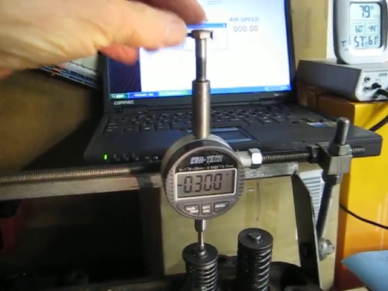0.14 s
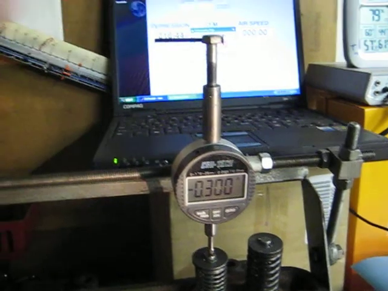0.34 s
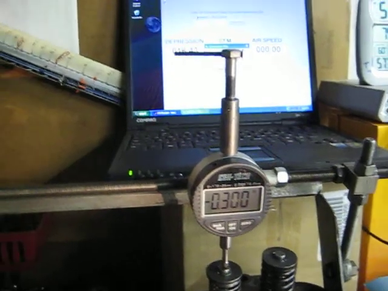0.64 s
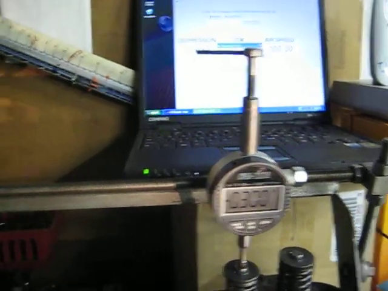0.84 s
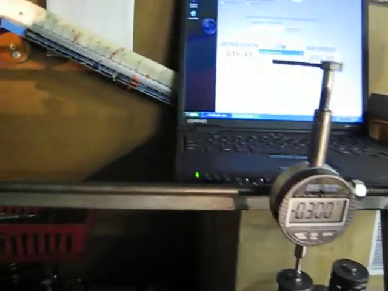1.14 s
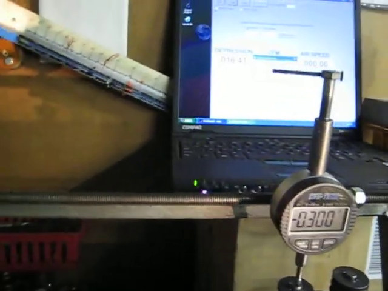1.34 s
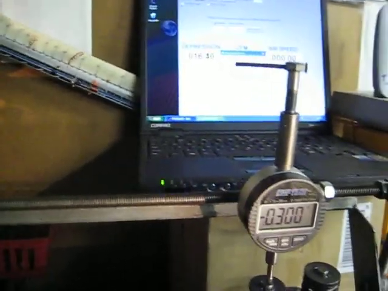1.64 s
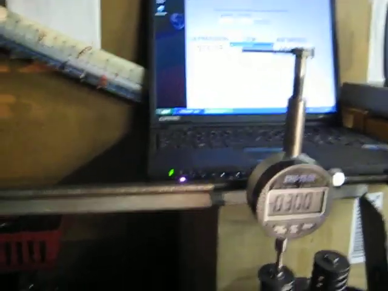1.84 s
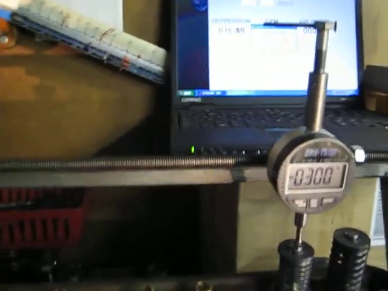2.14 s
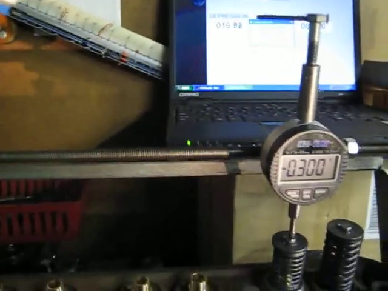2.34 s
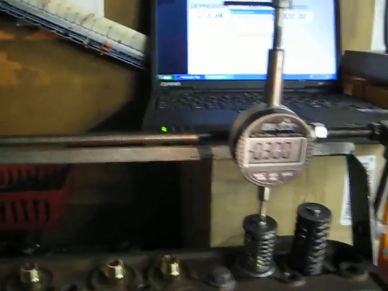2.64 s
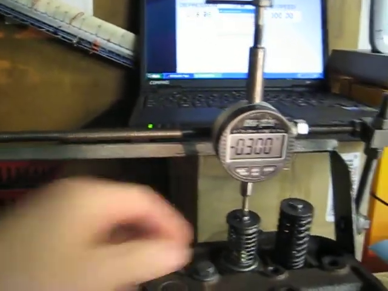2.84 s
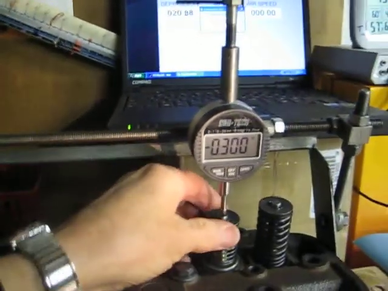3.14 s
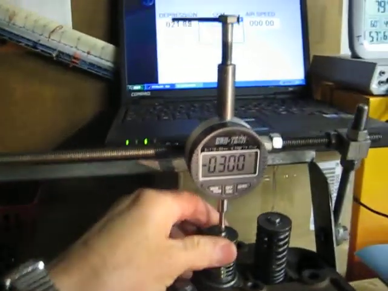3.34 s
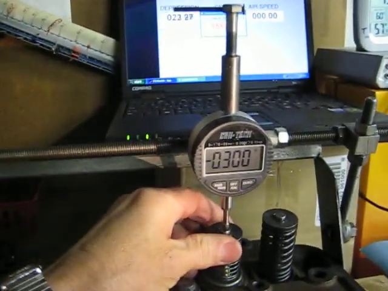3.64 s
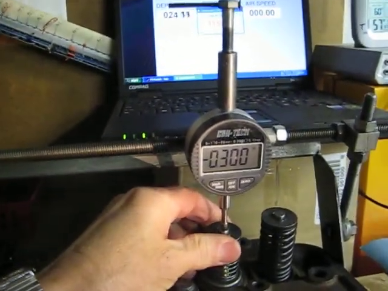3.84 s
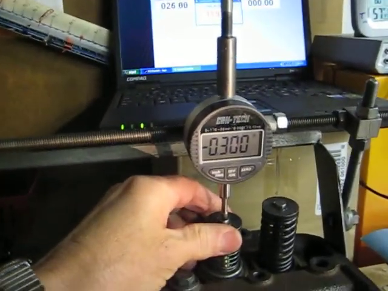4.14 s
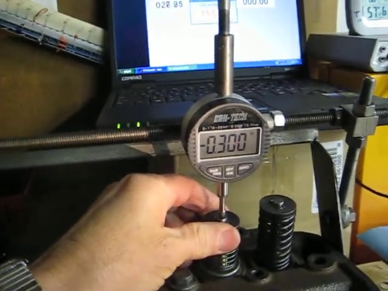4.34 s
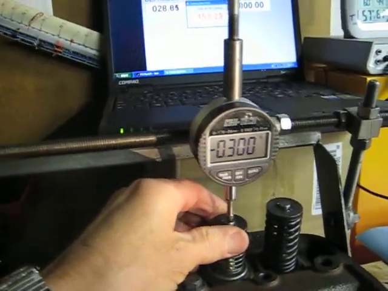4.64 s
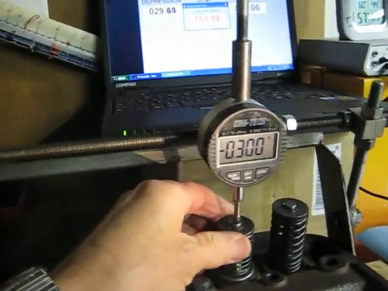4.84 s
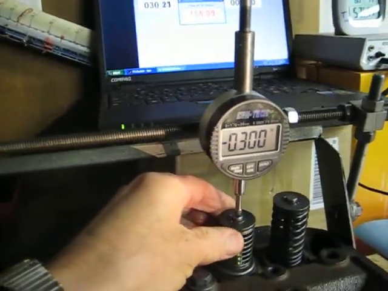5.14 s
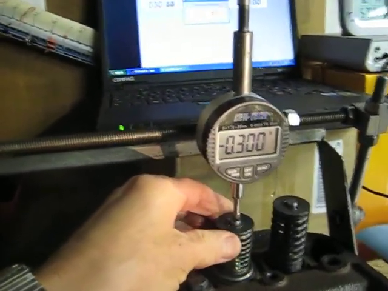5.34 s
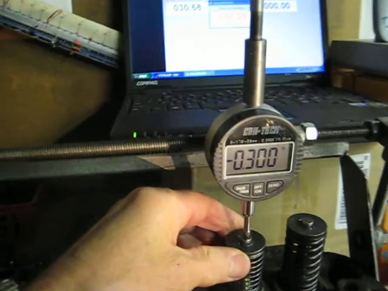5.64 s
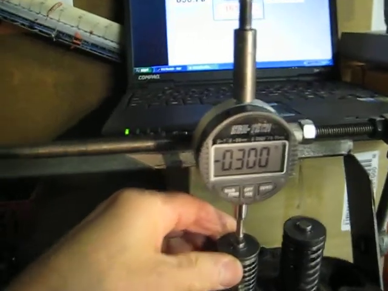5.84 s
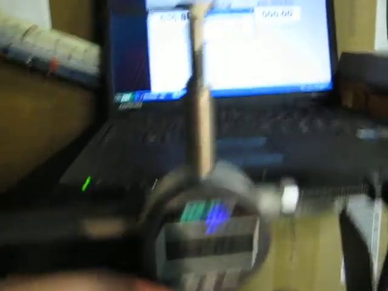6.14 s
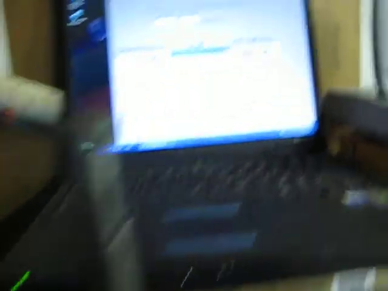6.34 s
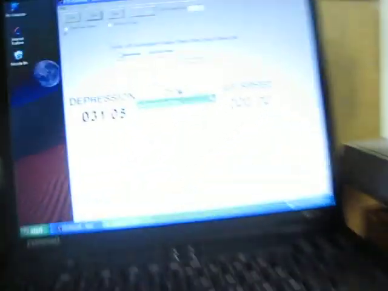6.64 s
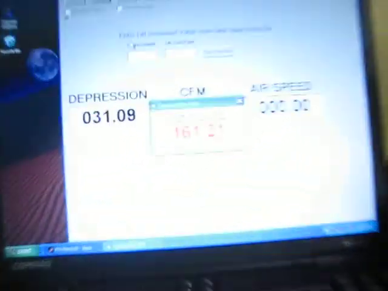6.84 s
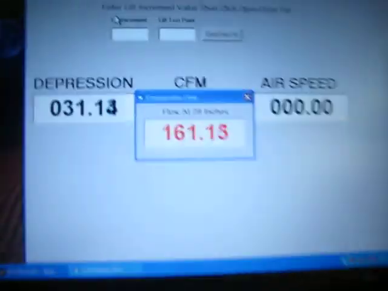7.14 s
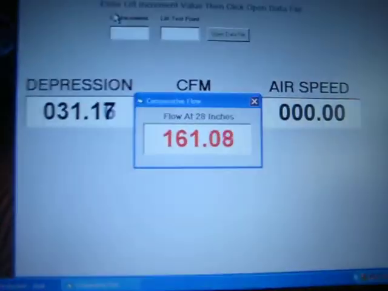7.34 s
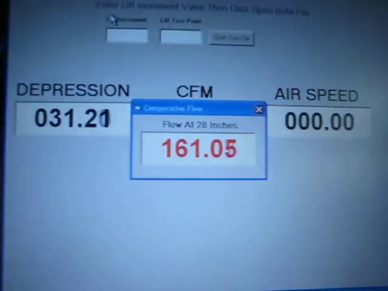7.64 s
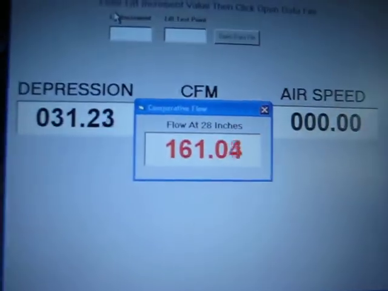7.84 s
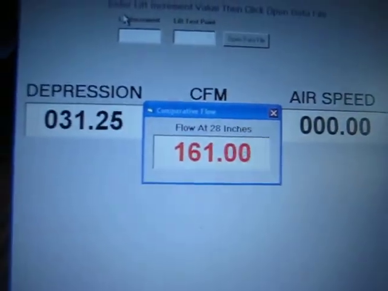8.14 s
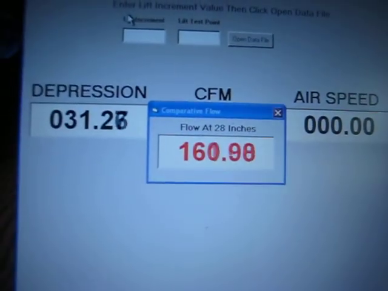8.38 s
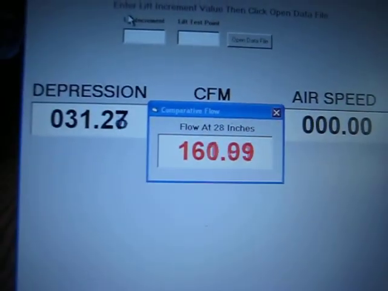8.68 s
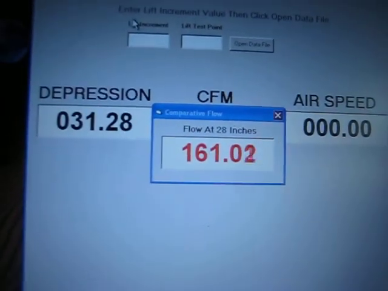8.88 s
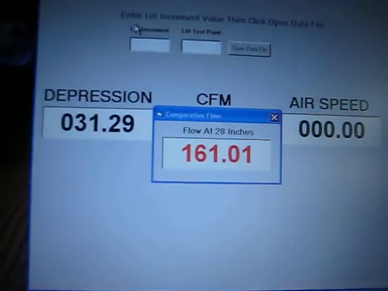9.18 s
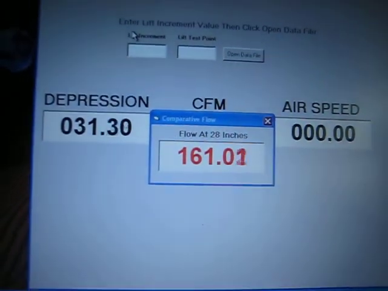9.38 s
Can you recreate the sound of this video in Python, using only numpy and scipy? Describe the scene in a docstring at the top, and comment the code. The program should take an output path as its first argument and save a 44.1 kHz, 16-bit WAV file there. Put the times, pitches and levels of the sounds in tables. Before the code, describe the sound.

From 0 seconds, a workshop air-suction machine is already running. Close to the valve, dense hiss rushes over two motor hums near 400 to 435 hertz that beat in a fast flutter, with a lower rotor, faint mains hum and a thin wavering whine near 3.5 kilohertz. At about 1.7 seconds another motor starts from rest, sweeping quickly upward; one running motor sags briefly, and the whine flares near 1.9. From 2 to 5 seconds suction builds: rotors creep up in pitch, the whine sinks back and the hiss brightens, fluttering slightly. Around 6 to 7.4 seconds the handheld microphone swings toward the cabinet; hiss bands sweep and glide with a hollow, phasing colour and the drone surges, its lows swelling. From 7.5 to 9.5 seconds it stays steady: loud resonant drone near 448 hertz, singing panels and coarse airy roar, without a stop.

```python
"""In a workshop, a flow bench sucks air through a cylinder head. Two vacuum motors, drawn as wavering sines,
beat against each other over a slower rotor. Near two seconds a late motor starts, the suction builds, the
rotors climb in speed and the hiss at the valve, which is filtered noise, brightens. At six seconds the
microphone swings from the port to a laptop on the bench, where the cabinet drones and sings louder."""
import sys
import numpy as np
from scipy import signal
from scipy.io import wavfile
from scipy.ndimage import uniform_filter1d

SR = 44100
rng = np.random.default_rng(int(sys.argv[2]) if len(sys.argv) > 2 else 0)


def pcm_store(signal):
    """Save signal as 16-bit PCM."""
    levels = np.round(np.clip(np.atleast_2d(signal), -1, 1) * 32767)
    wavfile.write(sys.argv[1], SR, levels.astype(np.int16).T)


N = 419391

# place of the hand-held microphone: (time [s], nearness [0 at the valve to 1 at the cabinet])
NEAR = [(0, 0.084), (1.3, 0.31), (1.85, 0.3), (2.5, 0.084), (4.1, 0.037), (6.0, 0.08), (6.5, 0.8),
        (7.35, 0.88), (9.5, 0.88)]
# rotors in the order fast, middle, late, slow:
# (shaft at low suction [Hz], shaft at full suction [Hz], lag [s], settling [s], deepest sag [Hz])
ROTOR_SPEEDS = [(434.4, 447.7, .08, 1.15, 0), (405.3, 416, 0, .9, 9.7), (380, 398.7, 0, 1.25, 0),
                (160, 258.5, .6, 1.05, 0)]
# the same rotors, before their own fades:
# (level at the valve [dB], level at the cabinet [dB], extra at low suction [dB], change in the quiet spot [dB])
ROTOR_LEVELS = [(-50.5, -21.5, 5.8, -2.5), (-43.5, -31.5, 6.5, -3.5), (-48.5, -34.5, 4.5, -4),
                (-66, -51, 5, -10)]
SWITCH_S = 1.72  # the late motor is switched on
BASS_NEAR = (0.76, 0.91)  # the lows of the cabinet only swell over this stretch of nearness


def undb(db):
    """Decibels to gain."""
    return 10 ** (np.asarray(db) / 20)


def curves(table, t):
    """The columns of a table, read at times t."""
    s, *columns = np.transpose(table)
    return [np.interp(t, s, column) for column in columns]


def nearness(t):
    """Where the microphone is, from 0 at the valve to 1 at the cabinet."""
    return curves(NEAR, t)[0]


def ramp(x, span):
    """Rises from 0 to 1 over a span of time or nearness."""
    return np.interp(x, span, [0, 1])


def walk(rate):
    """Random levels, rate of them a second, smoothed twice; spread near 1."""
    k = int(SR / rate)
    held = np.repeat(rng.standard_normal(N // k + 2), k)
    smooth = uniform_filter1d(uniform_filter1d(held, k), k)
    return 1.233 * smooth[:N]


def bells(f, modes):
    """Gain in dB of a set of bell-shaped peaks and dips."""
    return sum(db * np.exp(-(2 * (f - middle) / width) ** 2) for middle, width, db in modes)


def slope(f, points):
    """A spectrum in dB, straight between points on a log-frequency axis."""
    hz, db = np.transpose(points)
    return np.interp(np.log(f), np.log(hz), db)


def tone(hz, db, wobble_hz, flutter_db):
    """A sine of given rms level that wanders a little in pitch and strength."""
    phase = 2 * np.pi * np.cumsum(hz + wobble_hz * walk(25)) / SR
    return np.sqrt(2) * undb(db + flutter_db * walk(15)) * np.sin(phase)


def heard_db(levels, near, idle):
    """A source's level from where the microphone is and how low the suction (idle = 1) still is."""
    valve_db, cabinet_db, idle_db = levels
    return (1 - near) * valve_db + near * cabinet_db + idle * idle_db


def shaft_speed(t, low_hz, full_hz, lag_s, settle_s, sag_hz):
    """A rotor may sag while the late motor draws its starting current, then speeds up as the air thins."""
    sag_s = .33  # from the switch to the deepest sag
    suction = 1 - np.exp(-np.maximum(t - SWITCH_S - lag_s, 0) / settle_s)
    surge = np.maximum(t - SWITCH_S, 0) / sag_s
    sag = (surge * np.exp(1 - surge)) ** 1.3
    return low_hz + (full_hz - low_hz) * suction - sag_hz * sag


def rotor_db(t, levels, near):
    """A rotor's level; the swinging microphone crosses a quiet spot of the room's standing waves."""
    quiet_spot_s, quiet_length_s = 6.5, 0.44  # middle, length
    *steady, quiet_db = levels
    idle = 1 - ramp(t, (1.93, 3.1))  # the drone eases as the suction builds
    return heard_db(steady, near, idle) + bells(t, [(quiet_spot_s, quiet_length_s, quiet_db)])


def shaft_tone(hz, db):
    """A rotor shakes the cabinet once a turn."""
    return tone(hz, db, wobble_hz=0.25, flutter_db=0.4)


def motors(t):
    """The rotors that run from the start: the fast and middle speeds beat, and the fast one's fan whines."""
    # fade of the slow rotor, which sinks at the switch and returns with speed: (time [s], level change [dB])
    slow_fade = [(1.65, -2), (1.9, -16), (2.7, -10), (3.3, 2.5), (4.9, 4), (5.8, 1), (7.2, 3)]
    near = nearness(t)
    fast_speed, middle_speed, _, slow_speed = ROTOR_SPEEDS
    fast_level, middle_level, _, slow_level = ROTOR_LEVELS
    # the fast motor eases off by 1.2 Hz around the first second
    fast_hz = shaft_speed(t, *fast_speed) + 1.2 * (1 - ramp(t, (.5, 1.05)))
    fast_db = rotor_db(t, fast_level, near)
    fast = shaft_tone(fast_hz, fast_db)
    # it also shakes faintly three times a turn
    third = undb(-23) * tone(3 * fast_hz, fast_db, wobble_hz=1.5, flutter_db=2.5)
    middle = shaft_tone(shaft_speed(t, *middle_speed), rotor_db(t, middle_level, near))
    slow_db = rotor_db(t, slow_level, ramp(near, BASS_NEAR)) + curves(slow_fade, t)[0]
    slow = shaft_tone(shaft_speed(t, *slow_speed), slow_db)
    return fast + third + middle + slow + fan_whine(t, fast_hz)


def fan_whine(t, shaft_hz):
    """Eight blades chop the air eight times a turn."""
    # mean level of the whine: (time [s], level [dB])
    whine_level = [(0, -30.5), (.3, -29.5), (.8, -35), (1.0, -32.5), (1.45, -31), (1.76, -38),
                   (1.88, -29.5), (2.05, -32.5), (2.3, -40), (2.8, -49), (4.2, -48), (4.5, -40.5),
                   (6.2, -43.5), (6.5, -37.5), (6.75, -36), (6.92, -42), (7.2, -37.5), (7.6, -44),
                   (9.5, -43)]
    return tone(8 * shaft_hz, curves(whine_level, t)[0], wobble_hz=1.9, flutter_db=1.2)


def mains_hum(t):
    """Hum at twice the 60 Hz mains, which drops just after the switch."""
    # (level at the valve [dB], level at the cabinet [dB], extra until the drop [dB])
    hum_level = (-66, -49.2, 6.5)
    before_drop = 1 - ramp(t, (1.9, 1.96))
    db = heard_db(hum_level, nearness(t) ** 2, before_drop)
    return tone(2 * 60, db, wobble_hz=0.11, flutter_db=0.0)


def air(t, size=4096):
    """Turbulence coloured by the port, then more and more by the cabinet as the microphone nears it."""
    # the jet at the valve, before the air level: (frequency [Hz], power density [dB per Hz])
    jet = [(30, -96), (120, -88), (300, -78.5), (650, -73), (850, -65), (1600, -63.5), (1800, -57),
           (5200, -58), (6500, -62), (9500, -67.5), (13800, -73.5), (15600, -86)]
    # resonances and notches of port and bore: (frequency [Hz], width [Hz], gain [dB])
    port_modes = [(440, 65, 6), (505, 53, -1), (924, 34, 8), (1096, 60, 3), (1465, 50, 3), (1580, 75, -6),
                  (1805, 120, 3), (2460, 220, 3), (2810, 200, 3), (3270, 590, -5), (3750, 150, 2),
                  (4130, 440, -3), (4800, 420, 2), (5240, 130, 3), (5870, 1040, -7.5), (9030, 300, 2.5),
                  (9500, 500, -2.5), (10830, 700, 2.5)]
    # those that stand out only while the suction is low: (frequency [Hz], width [Hz], gain [dB])
    open_modes = [(342, 110, 2.5), (690, 50, 3), (950, 400, 3), (1320, 70, -1.5), (1790, 84, 4.5),
                  (1986, 85, 8), (2830, 1200, 2.5), (3880, 350, 3.5), (4300, 300, -1), (6500, 760, 2),
                  (8700, 480, -1), (9900, 550, -4)]
    # the roar at the cabinet, before the air level: (frequency [Hz], power density [dB per Hz])
    roar = [(30, -84), (120, -74.5), (300, -69), (420, -59.5), (620, -66.5), (750, -67.5), (830, -59.5),
            (1500, -61), (2600, -61.5), (5300, -63), (9500, -73.5), (13500, -81.3), (15600, -86.7)]
    # resonances and notches of the cabinet: (frequency [Hz], width [Hz], gain [dB])
    cabinet_modes = [(343, 36, 7.5), (943, 36, 2), (1140, 340, 2), (1352, 53, 5), (1721, 64, 11),
                     (1905, 120, 9.5), (2130, 77, -1.5), (2235, 38, 8.5), (2386, 47, 6.5), (2560, 36, 7.5),
                     (2740, 110, 3), (2990, 38, 7), (3130, 50, 4), (3405, 180, 7), (3620, 180, 7),
                     (3800, 100, -3), (4080, 50, 0), (4400, 50, 3), (4590, 70, 4), (4930, 70, -3),
                     (5260, 60, 4), (6000, 350, 3.5), (6560, 90, 2.5)]
    # air level: (change at the valve [dB], change at the cabinet [dB], extra at low suction [dB])
    air_level = (-0.09, 0.53, -0.6)
    bass_hz, idle_tilt_db = 370, -0.8  # top of the lows; tilt per octave at low suction

    white = rng.standard_normal(N) * np.sqrt(SR / 2)  # unit power per Hz
    overlap = size - size // 4
    f, s, frames = signal.stft(white, SR, nperseg=size, noverlap=overlap)
    f = np.maximum(f, 20)[:, None]
    near = nearness(s)
    idle = 1 - ramp(s, (2.07, 3))  # the jet changes colour as the suction builds
    port = slope(f, jet) + bells(f, port_modes)
    cabinet = slope(f, roar) + bells(f, cabinet_modes)
    bass = 1 / (1 + (f / bass_hz) ** 4)
    share = (1 - bass) * near + bass * ramp(near, BASS_NEAR)
    colour = (1 - share) * port + share * cabinet + idle * bells(f, open_modes)
    space = clutter(f, s, near) + hiss_bands(f, s) + lid_reflections(f, s)
    tilt = idle * idle_tilt_db * np.log2(f / 3000)
    gain = undb(colour + space + heard_db(air_level, near, idle) + tilt)
    return signal.istft(frames * gain, SR, nperseg=size, noverlap=overlap)[1][:N]


def flutter(rush, split_hz=4500, whole_db=0.42, sway_db=0.1, flicker_db=0.58):
    """The jet flaps around the valve, which shakes its treble most."""
    low = signal.sosfiltfilt(signal.butter(2, split_hz, fs=SR, output="sos"), rush)
    treble = (rush - low) * undb(sway_db * walk(14) + flicker_db * walk(60))
    return (low + treble) * undb(whole_db * walk(30))


def clutter(f, s, near, far_strength=0.21, near_strength=0.44, corner_hz=3000, count=24):
    """Weak echoes off small tools ripple the treble; each delay slides as the microphone travels."""
    path_m, drift_m_per_s = 0.356, 0.013  # from valve to cabinet; slow drift of the hand
    spread, heading, size = rng.uniform(-1, 1, (count, 3)).T
    delay_ms = 3 + 14 * abs(spread)
    travel_m = path_m * np.cumsum(abs(np.gradient(near))) + drift_m_per_s * s
    travel_ms = travel_m / .343  # sound covers .343 m in a millisecond
    lag = -2j * np.pi * f / 1000  # phase per ms of delay
    size = size / np.sqrt(np.sum(size ** 2))
    echoes = 0
    for a, ms, way in zip(size, delay_ms, heading):
        turn = lag * (ms + way * travel_ms)
        echoes = echoes + a * np.exp(turn.astype(np.complex64))
    treble = f / np.hypot(f, corner_hz)  # small things reflect only short waves well
    strength = ((1 - near) * far_strength + near * near_strength) * treble
    return 20 * np.log10(abs(1 + strength * echoes) + 1e-6)


def singing(t):
    """Panels and air gaps of the cabinet sing faintly; they fade with distance from it."""
    # wavering tones: (frequency [Hz], level at the valve [dB], level at the cabinet [dB], wander [Hz])
    cabinet_tones = [(327, -66, -48.5, 2), (518, -70, -49.5, 3.2), (712, -68, -54.5, 3),
                     (2497, -44.5, -38, 3.5), (4990, -58, -43, 8), (6385, -56, -48, 3)]
    near = nearness(t)
    song = 0
    for hz, valve_db, cabinet_db, wander_hz in cabinet_tones:
        db = heard_db((valve_db, cabinet_db, 0), near, 0)
        song = song + tone(hz, db, wobble_hz=wander_hz, flutter_db=1)
    return song


def hiss_bands(f, s):
    """Bands of hiss briefly swell or sink, some gliding in pitch, mostly during the microphone's swing."""
    # (middle [s], length [s], frequency at the middle [Hz], glide [Hz per s], width [Hz], gain [dB])
    bands = [(1.65, 1, 9400, 0, 500, -2), (2.3, 0.89, 5300, 0, 1000, 2), (2.45, .7, 3660, 250, 230, 2.5),
             (2.45, .7, 3800, 0, 260, -2), (2.93, .25, 4830, -6, 300, -9), (3.1, .35, 8300, 0, 350, 6),
             (4.0, .8, 5700, 0, 500, -5), (5.7, 0.65, 6480, 0, 400, 4), (5.88, 0.27, 4800, -300, 260, 3.5),
             (6.0, .2, 5300, 0, 500, -5), (6.22, 0.18, 4380, -900, 260, 4),
             (6.304, 0.88, 1910, 450, 340, 3), (6.3, 0.55, 3900, 300, 360, -8),
             (6.42, 0.16, 6650, -800, 380, 8), (6.48, 0.32, 5800, -1100, 700, 7.5),
             (6.6, 0.21, 4500, 0, 420, 9), (7.2, 1, 1640, 0, 130, -5), (7.0, 0.95, 2680, 330, 260, -6),
             (6.87, .5, 810, 300, 200, 3.5), (6.98, .26, 4600, 600, 380, 6.5), (7.0, .3, 4020, -5, 310, -2),
             (6.95, 0.34, 2140, 902, 220, 5), (6.8, 0.55, 3440, 0, 220, -6),
             (7.25, 0.75, 3200, 626, 220, 5), (6.68, .34, 2850, 950, 170, 5),
             (6.66, 0.23, 2120, 1400, 170, 3.5), (6.76, .22, 1820, 0, 110, 4.5),
             (6.72, .24, 1960, 600, 110, -4), (7.18, .36, 2340, 500, 140, 3),
             (7.35, .45, 7200, 1500, 2600, 2)]
    gain_db = 0
    for at, length, hz, glide, width, db in bands:
        envelope = np.exp(-(2 * (s - at) / length) ** 2)
        gain_db = gain_db + envelope * bells(f, [(hz + glide * (s - at), width, db)])
    return gain_db


def late_motor(t):
    """A motor starts from rest; its shaking grows steeply with speed and sweeps through the panels."""
    # resonances and notches of the panels: (frequency [Hz], width [Hz], gain [dB])
    panel_modes = [(247, 22, 7), (290, 20, 0), (322, 30, -10), (378, 20, -4)]
    spin_up_s = .385
    _, _, speed, _ = ROTOR_SPEEDS
    _, _, level, _ = ROTOR_LEVELS
    spin = np.tanh(np.maximum(t - SWITCH_S, 0) / spin_up_s)
    hz = shaft_speed(t, *speed) * spin
    force_db = 20 * np.log10(spin ** 3.4 + 1e-6)
    db = rotor_db(t, level, nearness(t)) + force_db + bells(hz, panel_modes)
    # it runs slightly out of line and also shakes twice a turn
    octave = undb(-6.5) * tone(2 * hz, db, wobble_hz=0.89, flutter_db=2.0)
    return shaft_tone(hz, db) + octave


def lid_reflections(f, s):
    """Comb colour in dB from the laptop lid; its bands glide up as the inverted echo's delay shortens."""
    # the echo as the microphone closes in: (time [s], delay [ms], share of the full echo [0-1])
    lid_echo = [(6.0, 2.7, 0), (6.4, 2.42, .4), (6.65, 2.08, .85), (6.8, 1.88, 1), (7.0, 1.65, 1),
                (7.12, 1.48, .9), (7.35, 1.39, .75), (7.6, 1.35, .6), (7.75, 1.33, 0)]
    full_echo, reach_hz = .25, 3600  # shorter waves scatter off the lid
    delay_ms, lid = curves(lid_echo, s)
    lag = -2j * np.pi * f / 1000  # phase per ms of delay
    strength = full_echo * lid / (1 + (f / reach_hz) ** 4)
    return 20 * np.log10(abs(1 - strength * np.exp(lag * delay_ms)))


def scene():
    """Motors, hum, cabinet and air, alike in both channels."""
    t = np.arange(N) / SR
    drone = motors(t) + mains_hum(t) + late_motor(t)
    bench = drone + flutter(air(t)) + singing(t)
    return np.array([bench, bench])


def record(dry):
    """A steep low-pass cuts the top above 15.6 kHz."""
    return signal.sosfilt(signal.ellip(12, .1, 90, 15600, fs=SR, output="sos"), dry)


dry = scene()
out = record(dry)
pcm_store(out)
```